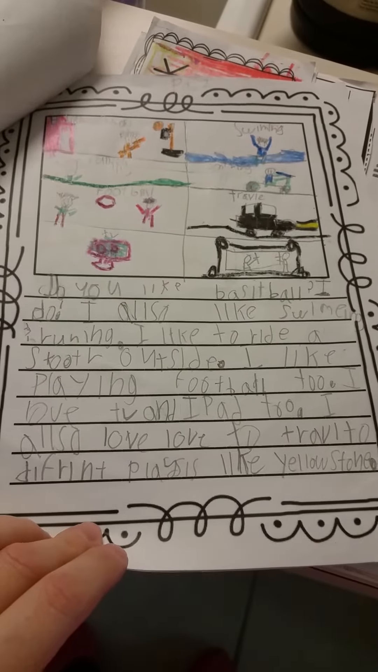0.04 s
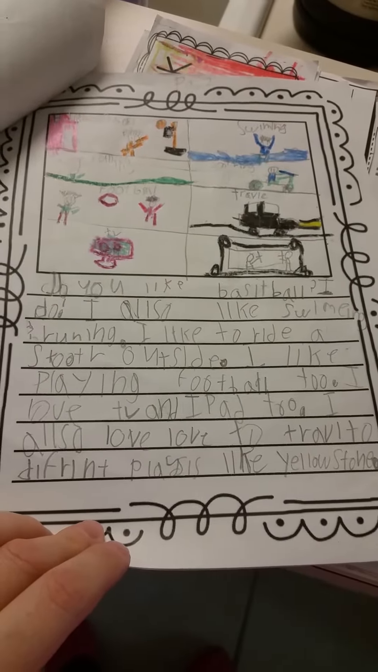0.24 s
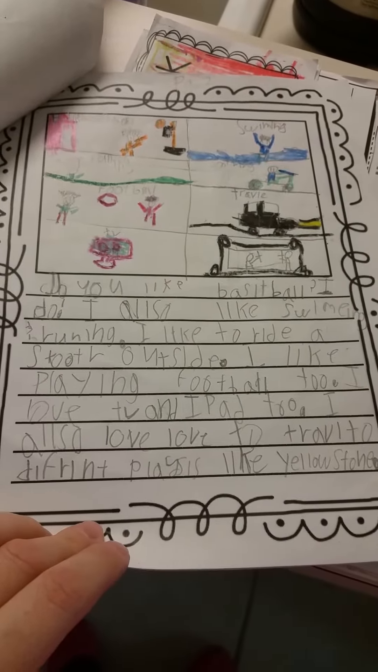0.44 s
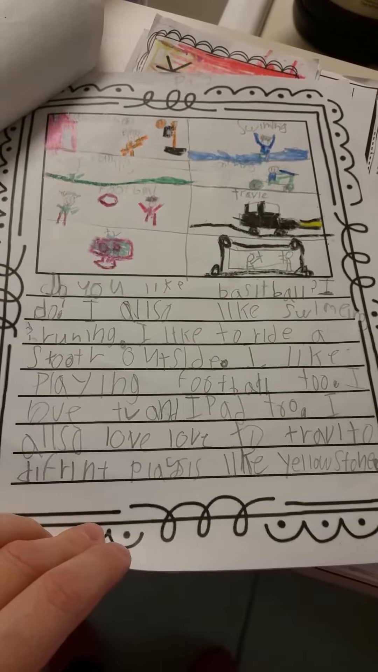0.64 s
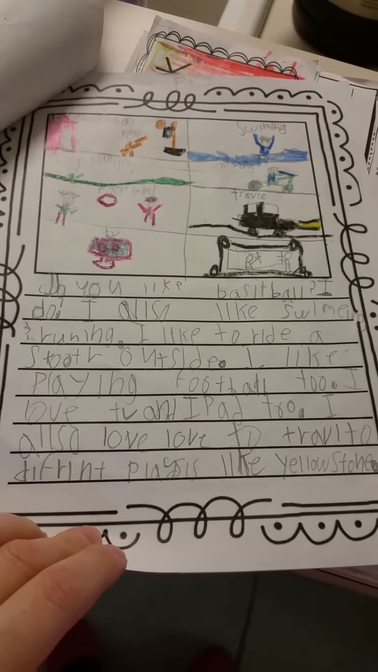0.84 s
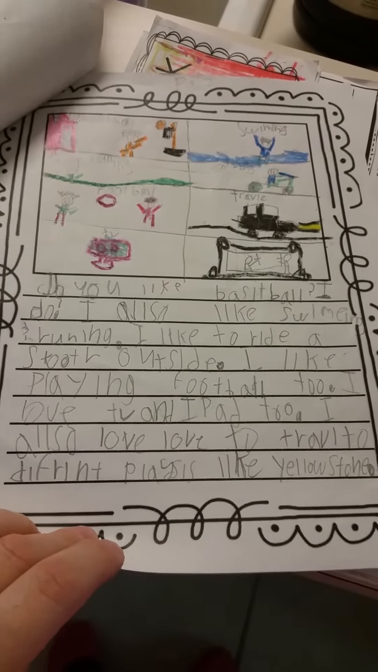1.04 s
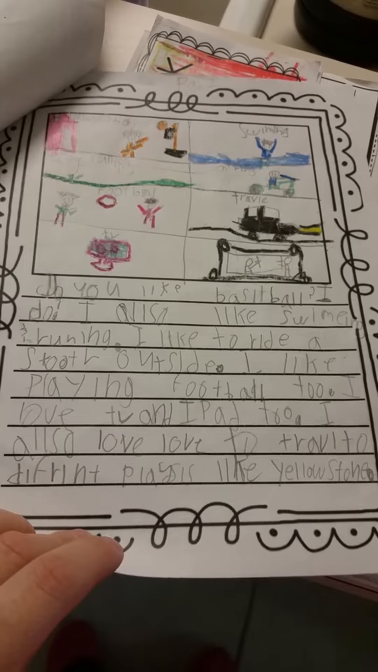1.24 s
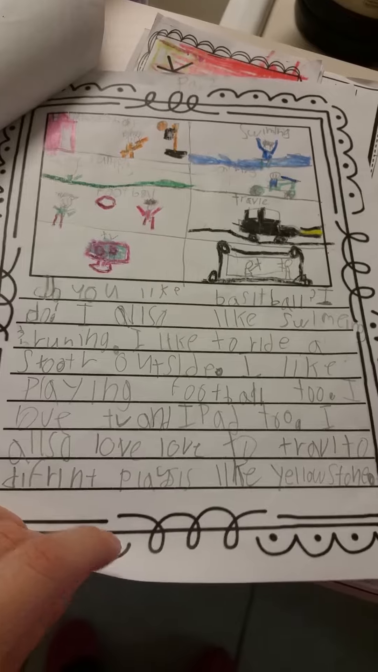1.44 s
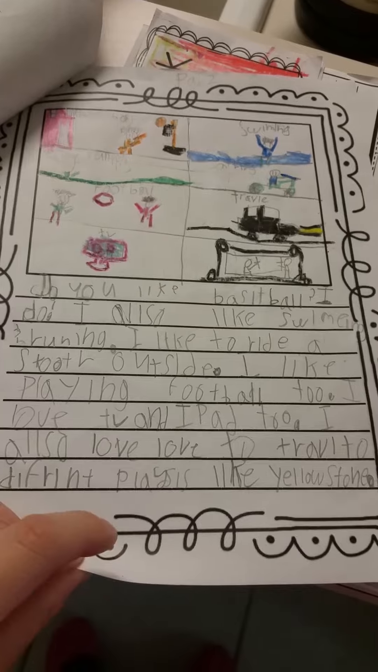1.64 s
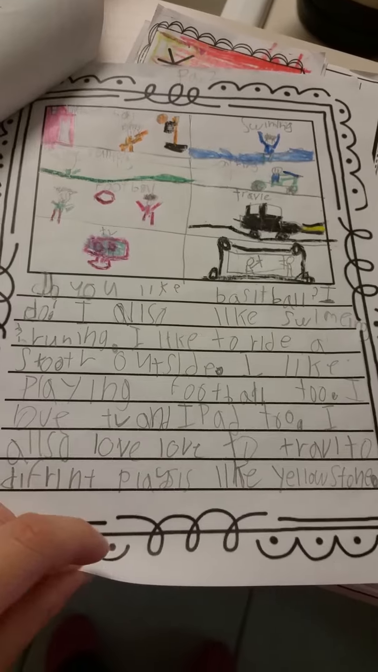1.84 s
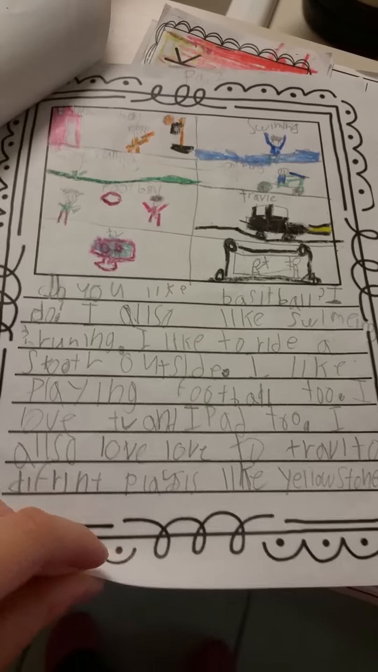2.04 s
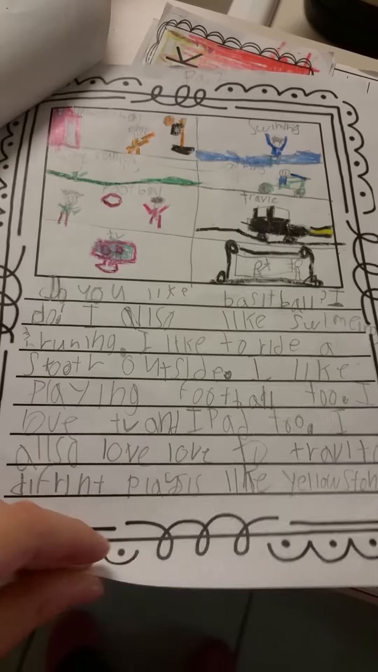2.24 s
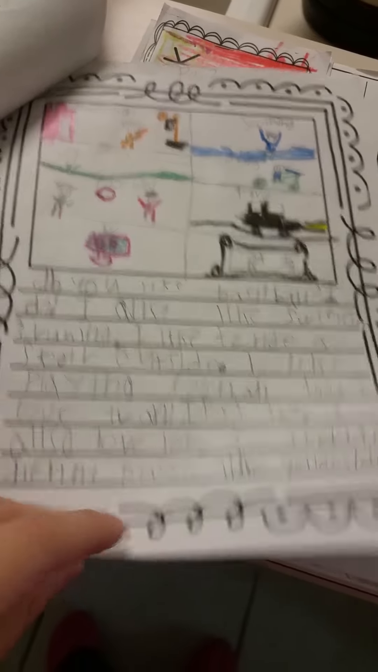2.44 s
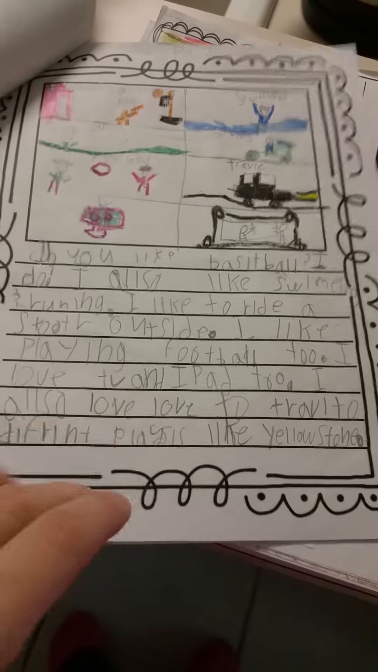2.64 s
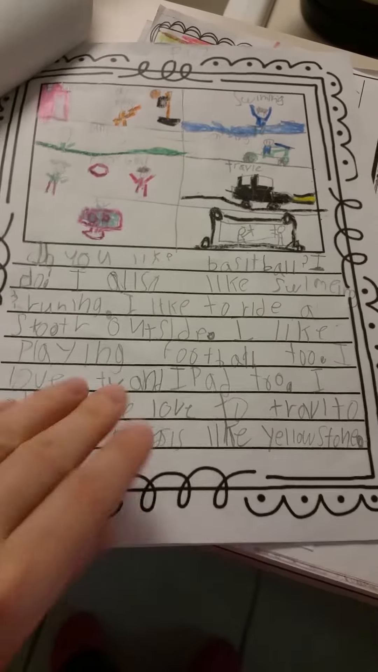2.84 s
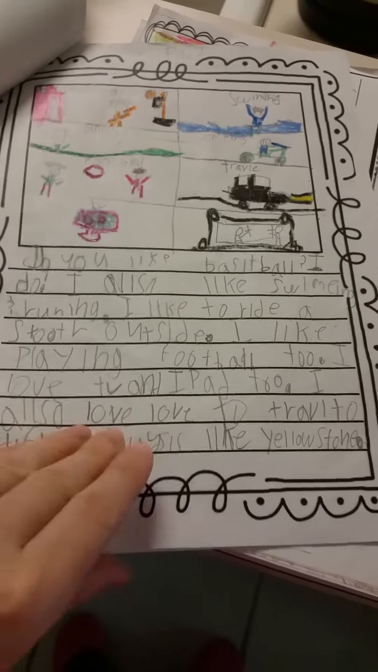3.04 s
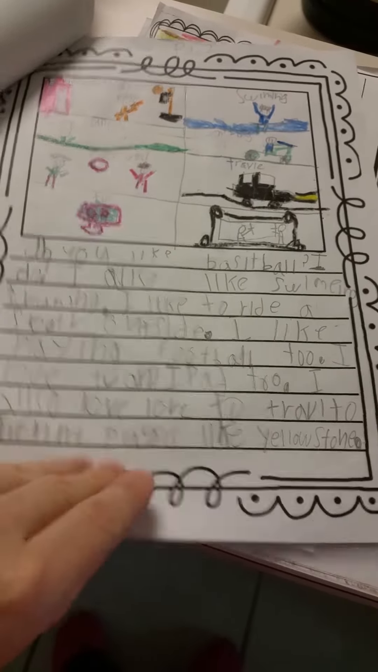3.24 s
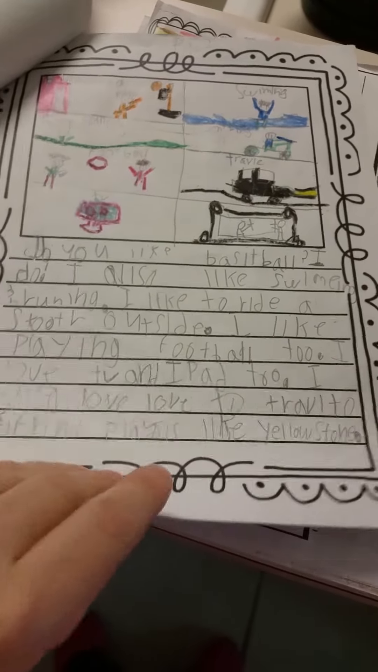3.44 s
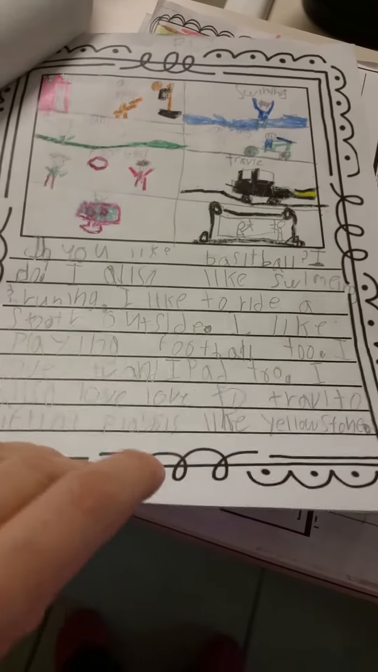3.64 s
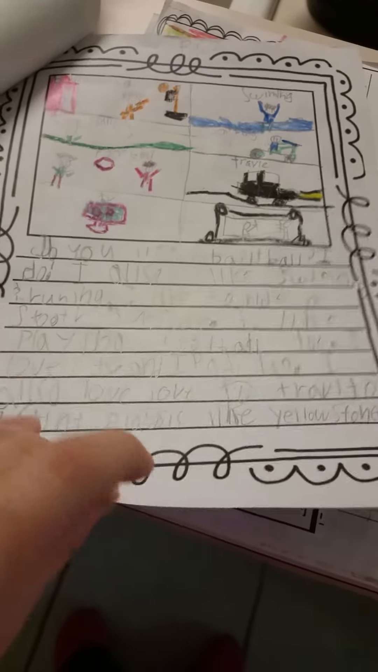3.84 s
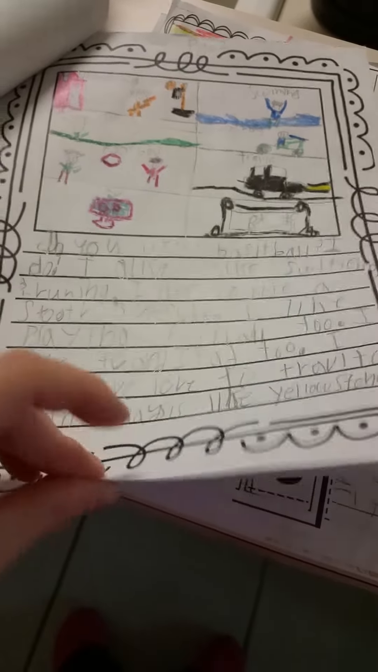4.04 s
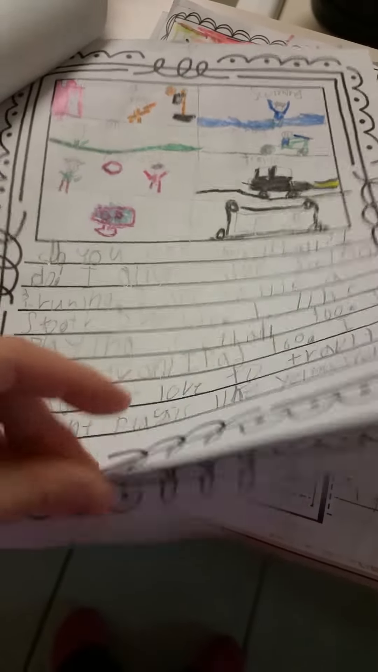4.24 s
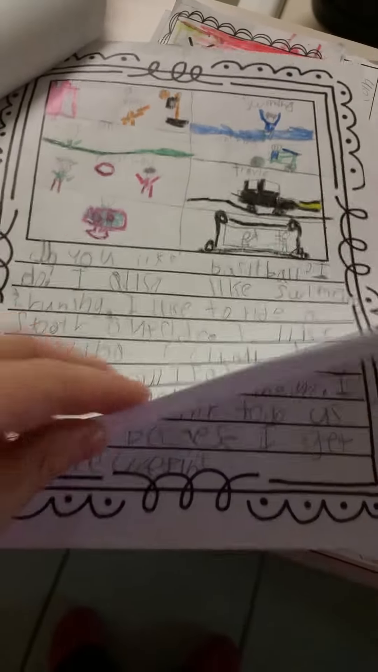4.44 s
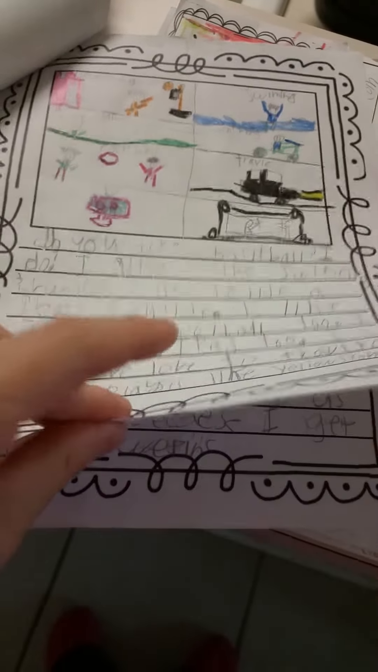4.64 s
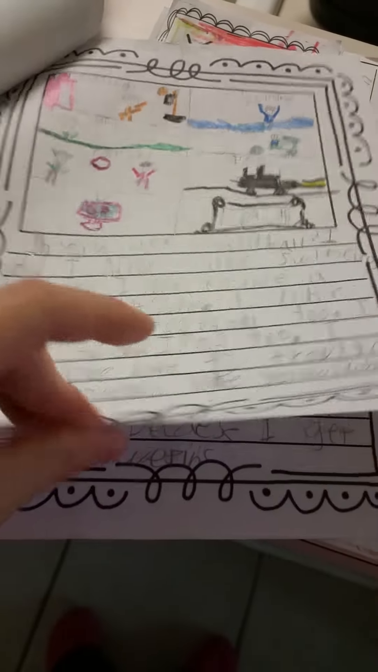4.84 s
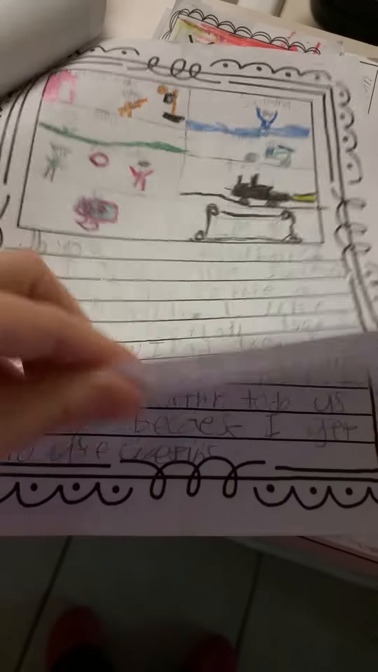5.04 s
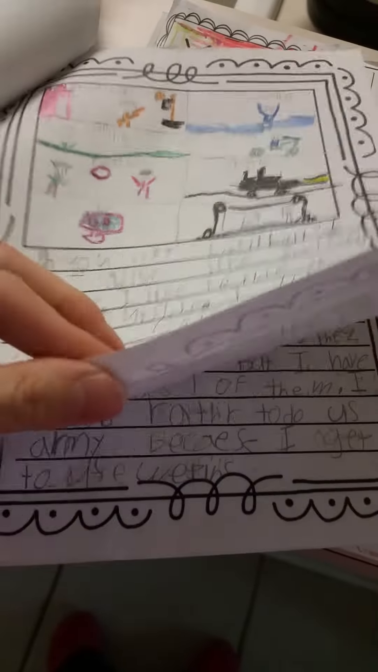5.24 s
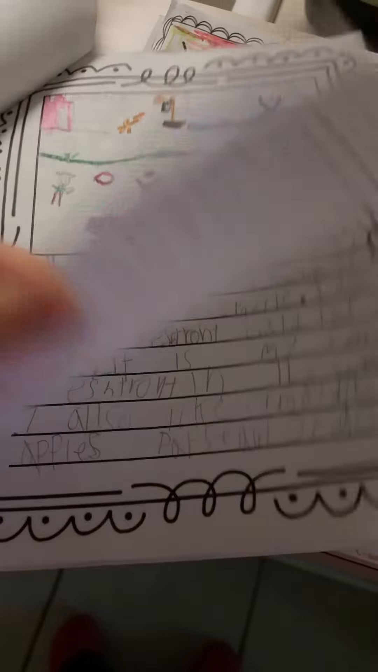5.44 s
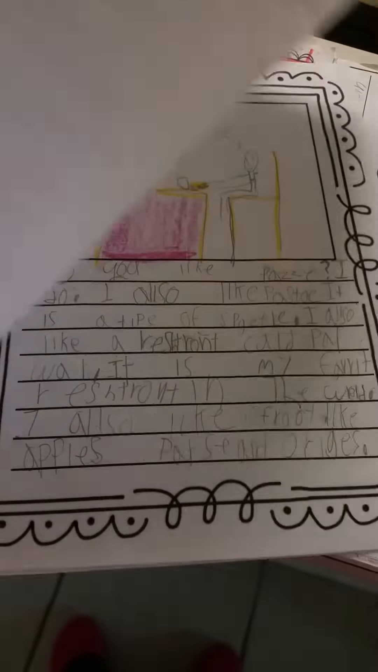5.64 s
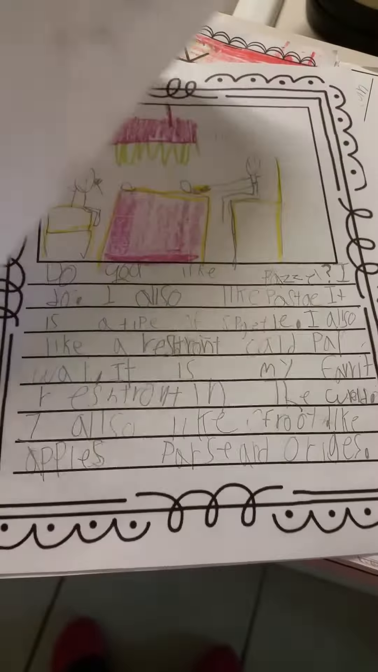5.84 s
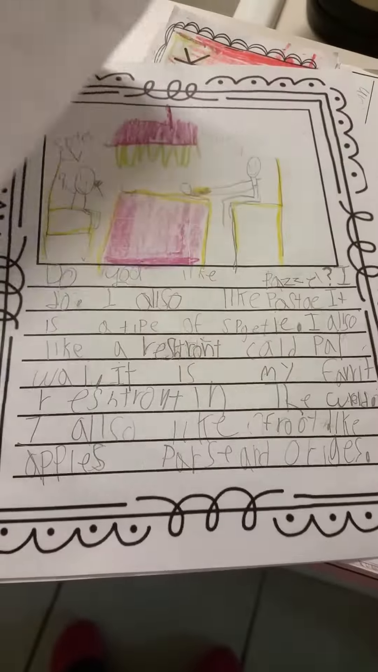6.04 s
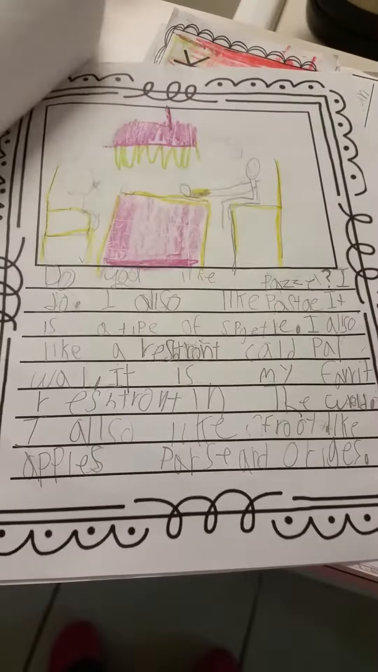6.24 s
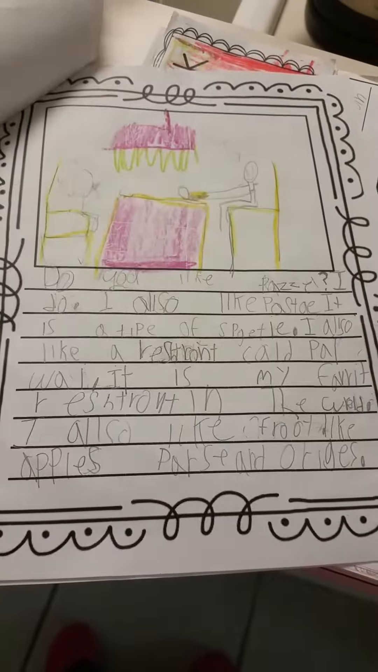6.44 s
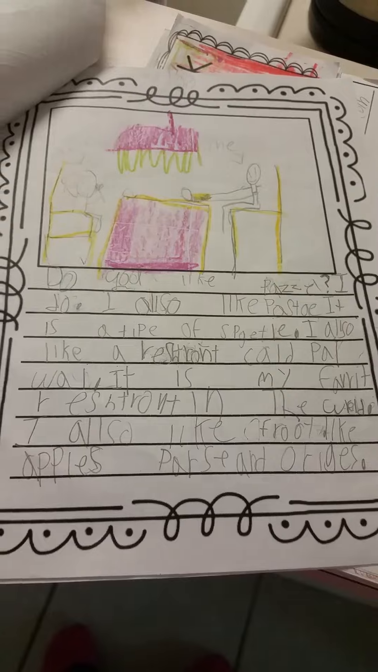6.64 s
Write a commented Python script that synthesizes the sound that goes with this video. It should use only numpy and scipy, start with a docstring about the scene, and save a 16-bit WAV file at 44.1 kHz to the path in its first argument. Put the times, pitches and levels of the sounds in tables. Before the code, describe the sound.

A hand leafs through paper on a desk, heard very close. Nearly still at first, with only fan air, a small tick, feathery brushing and one tap. Then intermittent sheet-on-sheet rustles, stuttering skin slips and edge crackles thicken into steady scraping. A bright rattling flap marks the page turning, followed by a soft thump, a light double knock and quiet settling in the small, damped room.

```python
"""Leafing through paper sheets

A hand leafs through a stack of paper on a desk in a quiet room, close to a two-port microphone.
Rubbing, brushes, crackles, flaps and finger thumps are filtered fibre clicks; skin slips ring the sheet.
The lifted page buckles in a run of pressure cusps as it swings over, then its edge knocks down.
Behind it a fan hums: shaped air noise and wavering sine lines."""
import sys
import numpy as np
from scipy import signal
from scipy.fft import rfft, irfft, next_fast_len
from scipy.io import wavfile
from scipy.ndimage import uniform_filter1d

SR = 44100
rng = np.random.default_rng(int(sys.argv[2]) if len(sys.argv) > 2 else 0)


def transcribe(signal):
    """Save signal, clipped to [-1, 1], as a 16-bit WAV file at the path in sys.argv[1]."""
    frames = np.atleast_2d(signal).T
    limited = np.clip(frames, -1, 1)
    pcm = np.round(limited * 32767).astype(np.int16)
    wavfile.write(sys.argv[1], SR, pcm)


N = 295835
TIME = np.arange(N) / SR
BINS = np.maximum(np.fft.rfftfreq(next_fast_len(N, True), 1 / SR), 1)   # Hz
FLAT = [(100, 0), (16000, 0)]   # freq_hz, level_db


# strokes of sheet over sheet: start_s, end_s, friction_db, swell_db over the stroke,
# edge_hiss_db re friction
SLIDE_STROKES = [(2.085, 2.151, -61.5, 14, -8.5), (2.339, 2.379, -52.5, -2, -7), (2.516, 2.662, -51, 1, 0),
                 (2.967, 3.004, -63.5, 4, -21), (3.061, 3.114, -66, -6, -3.5), (3.189, 3.225, -60, 9, -0.5),
                 (3.332, 3.378, -58, 4, 0), (3.462, 3.608, -60, 0, -5.5), (3.762, 3.772, -48, -10, -9.5),
                 (3.879, 3.925, -51.5, -1, -8.5), (3.998, 4.082, -55.5, -13, -6.5),
                 (4.272, 4.471, -52, 5, -6), (4.497, 4.64, -55.5, -6, -3), (4.63, 4.714, -60.5, -3, -19),
                 (4.725, 4.823, -51.5, 4.5, 3.5), (4.819, 4.979, -43.5, 3.5, 0.5),
                 (5.051, 5.112, -45, 5, 1), (5.154, 5.19, -51.5, 6, -6.5), (5.242, 5.345, -49, -0.5, -1.5),
                 (5.353, 5.426, -43, 4, -4.5), (5.508, 5.526, -48.5, 4.5, -4), (5.58, 5.627, -49, 2.5, -16),
                 (5.765, 5.826, -47.5, 3.5, -10.5), (5.925, 5.945, -47, -0.5, -4.5),
                 (6.006, 6.066, -56.5, -7, -3.5), (6.531, 6.549, -57, -6, 6.5),
                 (6.58, 6.685, -64.5, -3, -7)]
STROKE_ATTACK_S, STROKE_RELEASE_S = 0.011, 0.03


def strokes():
    """Friction and edge-hiss gains: each stroke sets in, swells or fades evenly in dB, and dies away."""
    t = TIME[::32]
    friction_power, edge_power = 0, 0
    for start_s, end_s, friction_db, swell_db, edge_hiss_db in SLIDE_STROKES:
        progress = np.clip((t - start_s) / max(end_s - start_s, .005), 0, 1)
        before = np.maximum(start_s - t, 0) / STROKE_ATTACK_S
        after = np.maximum(t - end_s, 0) / STROKE_RELEASE_S
        gain = from_db(friction_db + swell_db * (progress - .5)) * np.exp(-before - after)
        friction_power = friction_power + gain ** 2
        edge_power = edge_power + (gain * from_db(edge_hiss_db)) ** 2
    return [np.interp(TIME, t, np.sqrt(power)) for power in (friction_power, edge_power)]


# spectrum of the rubbing: freq_hz, density_db (per Hz, relative)
RUB_COLOUR = [(150, -7), (300, -2.5), (550, -5.5), (850, 3.5), (1300, 3), (1850, -2.5), (2700, 2.5),
              (3700, 0), (4600, 2), (5800, 3), (7300, 0), (8600, -5), (11500, -9.5), (15500, -15)]
# likeness of the two channels for paper sounds: freq_hz, likeness (0 to 1)
PAPER_ALIKE = [(100, 0.22), (350, 0.58), (550, 0.74), (680, 0), (1200, 0), (1900, 0.1), (12000, 0.091)]
# where the rubbing is heard: time_s, left_minus_right_db
RUB_PAN = [(2.3, 5.5), (3.4, 3.5), (4.6, -1), (5.4, 0), (6.0, 1.5)]


def slides(stroke_gain, edge_gain, grip_db=1.7, grip_hz=70, edge_hz=4600,
           arch_hz=1850, arch_db=-12, arch_from_s=4.8, arch_to_s=5.15):
    """Sheet rubs on sheet; grip wavers, a scraping edge sets the treble, the arched page resonates."""
    fine_grain = fibres(per_s=26000, spread_db=0.5)
    coarse_snags = from_db(-11) * fibres(per_s=900, spread_db=1.7)
    friction = coloured(fine_grain + coarse_snags, RUB_COLOUR, PAPER_ALIKE)
    friction = rms_one(desk_echo(friction))
    arched = uniform_filter1d(1. * ((TIME > arch_from_s) & (TIME < arch_to_s)), size=2000)
    resonance = rms_one(butter(friction, [arch_hz / 1.2, arch_hz * 1.2], "band", order=1))
    friction = friction + from_db(arch_db) * arched * resonance
    friction = rms_one(sheet_modes(friction)) * from_db(grip_db * drift(grip_hz))
    dull = shape(friction, 1 / (1 + (BINS / edge_hz) ** 4))
    edge_hiss = friction - dull
    pan_db = np.interp(TIME, *np.transpose(RUB_PAN))
    return panned(pan_db) * (stroke_gain * dull + edge_gain * edge_hiss)


# buckles and taps of the sheet: time_s, pulse_gain_db, near_port_width_ms,
# shiver_db re pulse gain, thump_db re pulse gain
BUCKLES = [(0.7892, -34.5, 0.084, -17, -12), (1.6266, -19.5, 0.035, -23.5, -16),
           (3.6691, -23, 0.098, -19.5, -20), (3.9963, -30.5, 0.095, -13, -25),
           (4.1324, -22, .065, -19.5, -24), (4.2464, -32, 0.075, -10, -13), (5.3968, -17, 0.03, -16.5, -45),
           (5.5758, -34, .2, -13.5, -12), (5.6088, -31.5, .12, -14, -5), (5.642, -25.5, 0.1, -12, -2.5),
           (5.6629, -22.5, .14, -12, -9), (5.683, -19.5, 0.13, -16.5, -4.5), (5.7172, -12, 0.11, -19, -7),
           (5.7374, -12, .12, -25, -10), (5.7555, -10.5, 0.18, -24.5, -9.5),
           (5.8077, -24.5, 0.56, -13.5, -4), (6.0312, -26.5, 0.073, -18, -7),
           (6.6838, -36.5, 0.029, -13.5, -6.5)]
# spectrum of the shiver: freq_hz, density_db (per Hz, relative)
SHIVER_SPECTRUM = [(150, -15), (300, -16), (500, -2), (900, 3), (1800, -7), (3000, -11), (4500, -11.5),
                   (6000, -7), (8000, -18.5), (15500, -31)]
# low cut at 0 dB thump; it rises an octave for each step the thump falls: less thump, less bass
FULL_THUMP_LOW_CUT_HZ, THUMP_DB_PER_OCTAVE = 180, 17.5
SWING_S = 5.5   # page leaves the held corner and swings across the microphone
CORNER_PAN_DB, CORNER_LAG_MS = 12.5, 0.32
SWING_PAN_DB, SWING_LAG_MS = .5, 0.29


def snaps(shiver_s=0.0048, linger_s=0.009, linger_db=-17, far_port_widening=3.0,
          thump_ms=0.92, thump_hz=70, top_hz=5500):
    """A buckle flips: one cusp of low pressure, a soft thump of the stack, then the sheet shivers."""
    shiver = coloured(rng.standard_normal((2, N)), SHIVER_SPECTRUM, PAPER_ALIKE)
    shiver = rms_one(desk_echo(shiver, echo=0.23))
    out = np.zeros((2, N))
    for time_s, pulse_gain_db, width_ms, shiver_db, thump_db in BUCKLES:
        at_corner = time_s < SWING_S
        pan_db, lag_ms = (CORNER_PAN_DB, CORNER_LAG_MS) if at_corner else (SWING_PAN_DB, SWING_LAG_MS)
        low_hz = min(FULL_THUMP_LOW_CUT_HZ * 2 ** (-thump_db / THUMP_DB_PER_OCTAVE), top_hz / 2)
        at = np.flatnonzero((TIME > time_s - .005) & (TIME < time_s + .12))
        t_s = TIME[at] - time_s
        t_ms = t_s * 1000
        port_times_ms = np.array([t_ms, (t_ms - lag_ms) / far_port_widening])
        cusp = -np.exp(-abs(port_times_ms) / width_ms)
        cusp = butter(butter(cusp, low_hz, "high", order=1), top_hz, "low", order=3)
        push = np.maximum(t_ms, 0) / thump_ms
        thump = from_db(thump_db) * butter((push * np.exp(1 - push)) ** 2, thump_hz, "high")
        pulse = (cusp + thump) * panned(pan_db)
        decay = np.exp(-abs(t_s) / shiver_s) + from_db(linger_db) * np.exp(-abs(t_s) / linger_s)
        shaking = from_db(shiver_db) * (t_s > 0) * decay * shiver[:, at]
        out[:, at] += from_db(pulse_gain_db) * (pulse + shaking)
    return out


# the page's edge lands: time_s, blow_db
LANDINGS = [(6.1657, -26.5), (6.1670, -31.5), (6.2110, -45.5)]
# modes of the landing edge: freq_hz, level_db, t60_s
EDGE_MODES = [(510, -11, 0.021), (680, -4.5, 0.019), (1080, 1, 0.024), (1400, 1.5, 0.0075),
              (1900, 3, 0.0096), (2650, -6.5, 0.014), (3230, -19, 0.022)]


def knocks(lag_s=0.00026, pan_db=2, low_hz=380, top_hz=3800):
    """Edge lands in two quick contacts and bounces once, nearer the left port; too small for bass."""
    blows = np.zeros(N)
    for time_s, blow_db in LANDINGS:
        blows[round(time_s * SR)] = -from_db(blow_db)
    modes = sum(from_db(level_db) * ring(blows, hz, t60_s) for hz, level_db, t60_s in EDGE_MODES)
    left = butter(modes, [low_hz, top_hz], "band")
    right = np.interp(TIME - lag_s, TIME, left)
    return np.array([left, right]) * panned(pan_db)


# fingertip sticks and slips: start_s, end_s, level_db, fade_db (gain change over the stroke)
SLIP_STROKES = [(3.758, 3.792, -53.5, 2), (3.882, 3.932, -47.5, 0), (3.996, 4.027, -47.5, -7)]
JUDDER_HZ = 1870   # stiff sheet's resonance


def judders(slips_per_s=750, unevenness=.35, spread_db=2.5, ring_t60_s=0.0051,
            scratch_db=-6, scratch_hz=3400, pan_db=2):
    """Uneven slips of the skin, each ringing the stiff sheet for a few cycles."""
    out = np.zeros((2, N))
    for start_s, end_s, level_db, fade_db in SLIP_STROKES:
        length_s = max(end_s - start_s, .005)
        gaps, sizes = rng.standard_normal((2, 60))
        when_s = np.cumsum(np.exp(unevenness * gaps)) / slips_per_s
        when_s -= when_s[0]
        live = when_s < length_s
        slips = np.zeros(SR // 10)
        slip_db = spread_db * sizes[live] + fade_db * when_s[live] / length_s
        slips[(when_s[live] * SR).astype(int)] = from_db(slip_db)
        tone = rms_one(butter(ring(slips, JUDDER_HZ, ring_t60_s), 670, "high"))
        contact = signal.lfilter([1], [1, -.97], slips)
        scratch = butter(contact * rng.standard_normal((2, len(slips))), [350, scratch_hz], "band")
        sound = rms_one(tone + from_db(scratch_db) * rms_one(scratch))
        # level holds over the stroke, not over the longer buffer
        sound = sound * np.sqrt(length_s * SR / len(slips))
        add(out, start_s, sound * from_db(level_db) * panned(pan_db))
    return out


# fingertip brushes the corner: loudest_s, sigma_ms, level_db
CORNER_BRUSHES = [(0.932, 6.1, -64), (0.995, 13, -64), (1.039, 6, -60), (1.061, 4.4, -59),
                  (1.118, 6.4, -61.5), (1.192, 7, -53.5), (1.232, 9, -56.5), (1.311, 3.5, -53),
                  (1.321, 2.7, -51.5), (1.484, 8.6, -61), (1.538, 3, -51.5), (1.559, 13, -55.5),
                  (1.641, 12, -56)]
BRUSH_HZ, BRUSH_PAN_DB = 3000, 2.5


def brushes(grains):
    """Light brushes of a fingertip: brief swells of fibre clicks."""
    return sum(swell(grains, loudest_s, sigma_ms, level_db, BRUSH_HZ, BRUSH_PAN_DB)
               for loudest_s, sigma_ms, level_db in CORNER_BRUSHES)


# an edge catches: loudest_s, level_db, centre_hz, left_minus_right_db
EDGE_CRACKLES = [(2.459, -52, 2450, 5), (2.604, -44, 5860, -3), (2.636, -44, 1890, 3),
                 (2.664, -34.5, 4200, 0), (3.592, -49, 2640, 4), (3.626, -39, 2200, -1),
                 (4.334, -32, 3240, -2), (5.360, -40, 4930, -7), (5.399, -52, 2020, -2),
                 (5.427, -30, 1840, -3), (5.614, -42.5, 3720, -8), (5.769, -45, 3500, -4),
                 (5.809, -49, 4440, -5)]
CRACKLE_SIGMA_MS = 2.35


def crackles(grains):
    """A catching edge frees fibres in a short burst, each in its own band."""
    return sum(swell(grains, loudest_s, CRACKLE_SIGMA_MS, level_db, centre_hz, pan_db)
               for loudest_s, level_db, centre_hz, pan_db in EDGE_CRACKLES)


# soft page flaps and low finger thumps: loudest_s, sigma_ms, level_db, centre_hz
FLAPS_AND_THUMPS = [(2.607, 13, -57.5, 110), (3.600, 12, -50, 90.5), (4.165, 24, -59, 620),
                    (5.945, 47, -46, 820), (6.017, 4.7, -38, 267), (6.040, 9.5, -35, 706),
                    (6.358, 7.5, -49.5, 740), (6.571, 16, -49.5, 550)]
FLAP_PAN_DB = 2


def flaps_and_thumps(grains):
    """Soft page flaps and low finger thumps: swells of clicks in low bands."""
    return sum(swell(grains, loudest_s, sigma_ms, level_db, centre_hz, FLAP_PAN_DB)
               for loudest_s, sigma_ms, level_db, centre_hz in FLAPS_AND_THUMPS)


# how freely the lifted page moves air: time_s, level_db
LIFTED_WOBBLE = [(3.45, -71), (3.7, -68), (4.42, -57), (4.7, -66.5), (5.25, -70), (5.42, -60), (5.54, -58),
                 (5.78, -49), (5.88, -60.5), (6.14, -57.5), (6.3, -69)]
# spectrum of the wobble: freq_hz, density_db (per Hz, relative)
WOBBLE_SPECTRUM = [(20, -38), (40, -3), (100, 0), (200, -1), (330, -0.5), (550, 4.5), (750, -5.5),
                   (1300, -13), (2500, -30)]


def wobble(stroke_gain, stroke_db=-15, flutter_db=4.0, flutter_hz=32):
    """The loose page flexes and moves air in lumps; every stroke shakes it a little too."""
    time_s, level_db = np.transpose(LIFTED_WOBBLE)
    lifted = from_db(np.interp(TIME, time_s, level_db)) * (TIME > time_s[0]) * (TIME < time_s[-1])
    gain = np.hypot(lifted, from_db(stroke_db) * stroke_gain)
    air = coloured(rng.standard_normal((2, N)), WOBBLE_SPECTRUM, PAPER_ALIKE)
    return gain * rms_one(air * from_db(flutter_db * drift(flutter_hz)))


# likeness of the two channels for room sounds: freq_hz, likeness (0 to 1)
ROOM_ALIKE = [(30, 0.7), (250, 0.76), (500, 0.97), (700, 0), (12000, 0)]
# decay of the tail before its treble cut: freq_hz, t60_s
ROOM_DECAY = [(100, 0.44), (500, 0.43), (2800, 0.62), (5000, 0.78), (12000, 0.07)]
ROOM_WET_DB = -20


def room(x, first_echo_s=0.0049, dull_hz=3000):
    """Diffuse reflections, dulled by the furnishings and dying fastest at the top."""
    t = TIME[:SR // 2]
    edges_hz = np.geomspace(60, 16000, 17)
    noise = coloured(rng.standard_normal((2, N)), FLAT, ROOM_ALIKE)[:, :len(t)]
    t60s = np.interp(np.sqrt(edges_hz[:-1] * edges_hz[1:]), BINS, at_hz(ROOM_DECAY))
    tail = 0
    for k, t60_s in enumerate(t60s):
        band = butter(noise, edges_hz[k:k + 2], "band") * from_db(-60 * t / t60_s)
        tail = tail + (-1) ** k * band   # neighbouring bands have opposite signs
    tail = butter(tail, dull_hz, "low", order=1) * (t > first_echo_s)
    tail = rms_one(tail) / np.sqrt(len(t))
    return from_db(ROOM_WET_DB) * signal.fftconvolve(x, tail, axes=1)[:, :N]


# spectrum of the quiet room's air: freq_hz, density_db (per Hz, relative)
AIR_COLOUR = [(25, -25), (50, -3), (90, -2.5), (130, -3), (180, -0.5), (300, -3), (550, -5), (720, -12),
              (1100, -12.5), (1500, -19), (3200, -19.5), (4500, -25), (7200, -27), (8800, -24.5),
              (11000, -27), (15500, -27.5)]
# the fan's lines: freq_hz, level_db (rms, before hum_trim_db)
FAN_LINES = [(180, -70), (240, -77.5), (269, -72), (301, -72.5), (361, -76.5), (600, -78.5)]


def fan(air_db=-63.5, hum_trim_db=-1, waver_rad=0.4, waver_hz=2):
    """Steady air noise with a few low lines of wavering phase."""
    air = from_db(air_db) * coloured(rng.standard_normal((2, N)), AIR_COLOUR, ROOM_ALIKE)
    lines = 0
    for freq_hz, level_db in FAN_LINES:
        phase = 2 * np.pi * freq_hz * TIME + waver_rad * drift(waver_hz)
        lines = lines + from_db(level_db + hum_trim_db) * np.sqrt(2) * np.sin(phase)
    return air + lines


def fibres(per_s, spread_db):
    """Fibres catch and let go: dense clicks of uneven size, reaching each port differently."""
    caught = rng.random(N) < per_s / SR
    sizes = from_db(spread_db * np.minimum(rng.exponential(1, N), 4))
    return rms_one(caught * sizes * rng.standard_normal((2, N)))


def swell(grains, loudest_s, sigma_ms, level_db, hz, pan_db, breadth=2.64, top_ratio=1.44):
    """A brief Gaussian swell of fibre clicks in a broad band."""
    out = np.zeros((2, N))
    at = np.flatnonzero(abs(TIME - loudest_s) < .06)
    rub = rms_one(butter(grains[:, at], [hz / breadth, hz * breadth], "band", order=1))
    rub = butter(rub, hz * top_ratio, "low")
    envelope = np.exp(-.5 * ((TIME[at] - loudest_s) * 1000 / sigma_ms) ** 2)
    out[:, at] = from_db(level_db) * panned(pan_db) * rub * envelope
    return out


def desk_echo(x, delay_s=0.000528, echo=0.33, sway=0.062, sway_hz=2.1):
    """Sound returns from the stack below; the path sways with the sheet and combs the spectrum."""
    def with_echo(side):
        path_s = delay_s * (1 + sway * drift(sway_hz))
        return side + echo * np.interp(TIME - path_s, TIME, side)
    return np.array([with_echo(side) for side in x])


def sheet_modes(x, ripple_db=2.5, ripple_hz=5, count=22):
    """As the sheet bends, its resonances come and go: each narrow band swells and fades by itself."""
    place = np.clip(np.log(BINS / 500) / np.log(9000 / 500), 0, 1) * (count - 1)
    size = next_fast_len(N, True)
    spectrum = rfft(x, size)
    out = 0
    for k in range(count):
        band = irfft(spectrum * np.maximum(1 - abs(place - k), 0), size)[:, :N]
        out = out + band * from_db(ripple_db * drift(ripple_hz))
    return out


def ring(x, hz, t60_s):
    """A mode: a unit click sets a sine of starting height 1 ringing."""
    r, w = from_db(-60 / (t60_s * SR)), 2 * np.pi * hz / SR
    return signal.lfilter([0, np.sin(w)], [1, -2 * r * np.cos(w), r * r], x + 1e-18)


def coloured(source, colour, likeness):
    """Two unrelated signals become stereo with a spectrum and a channel likeness; rms 1."""
    gain = from_db(at_hz(colour))
    alike = np.clip(at_hz(likeness), 0, .99)
    mid, side = shape(source, gain * np.sqrt([1 + alike, 1 - alike]))
    return rms_one(np.array([mid + side, mid - side]))


def drift(hz):
    """Slow chance of rms 1."""
    return rms_one(shape(rng.standard_normal(N), 1 / (1 + (BINS / hz) ** 2)))


def from_db(db):
    """Decibels to gain."""
    return 10 ** (np.asarray(db) / 20)


def rms_one(x):
    """Scale to rms 1."""
    return x / np.sqrt(np.mean(x ** 2) + 1e-20)


def at_hz(points):
    """Read a table of freq_hz, value at every frequency bin."""
    hz, value = np.transpose(points)
    return np.interp(np.log(BINS), np.log(hz), value)


def shape(x, gain):
    """Filter by a gain per frequency bin."""
    size = next_fast_len(N, True)
    return irfft(rfft(x, size) * gain, size)[..., :N]


def butter(x, hz, kind, order=2):
    """Causal Butterworth filter."""
    sos = signal.butter(order, np.clip(hz, 10, .45 * SR), kind, fs=SR, output="sos")
    return signal.sosfilt(sos, x)


def panned(pan_db):
    """Left and right gains for a level difference."""
    return from_db(np.array([[.5], [-.5]]) * pan_db)


def add(out, start_s, sound):
    """Mix a short sound in at a time."""
    i = int(round(start_s * SR))
    out[:, i:i + sound.shape[-1]] += sound[..., :N - i]


def scene():
    """Rubbing and snapping paper in the room, over the fan."""
    stroke_gain, edge_gain = strokes()
    grains = coloured(fibres(per_s=5000, spread_db=2.5), FLAT, PAPER_ALIKE)
    paper = slides(stroke_gain, edge_gain) + snaps() + knocks() + judders()
    paper = paper + brushes(grains) + crackles(grains) + flaps_and_thumps(grains) + wobble(stroke_gain)
    return paper + room(paper) + fan()


# resonances in which the ports differ: freq_hz, q, left_minus_right_db
PORT_PEAKS = [(530, 4.1, -9), (1860, 4.7, 4.5), (2840, 5.9, 6.5), (4130, 2.1, -1.5), (7680, 6, -13.5),
              (8320, 3.8, 9)]
CUTOFF_HZ = 15900


def port(x, sign):
    """One microphone port: a chain of peaks and dips, each half the difference."""
    for freq_hz, q, difference_db in PORT_PEAKS:
        w = 2 * np.pi * freq_hz / SR
        a = from_db(sign * difference_db / 2) ** .5
        k = np.sin(w) / (2 * q)
        x = signal.lfilter([1 + k * a, -2 * np.cos(w), 1 - k * a],
                           [1 + k / a, -2 * np.cos(w), 1 - k / a], x)
    return x


def record(dry):
    """Each port adds its colour, the converter a tiny offset, and the top is cut steeply."""
    heard = np.array([port(dry[0], 1), port(dry[1], -1)]) - .0005
    return signal.sosfilt(signal.ellip(10, .1, 70, CUTOFF_HZ, fs=SR, output="sos"), heard)


dry = scene()
out = record(dry)
transcribe(out)
```